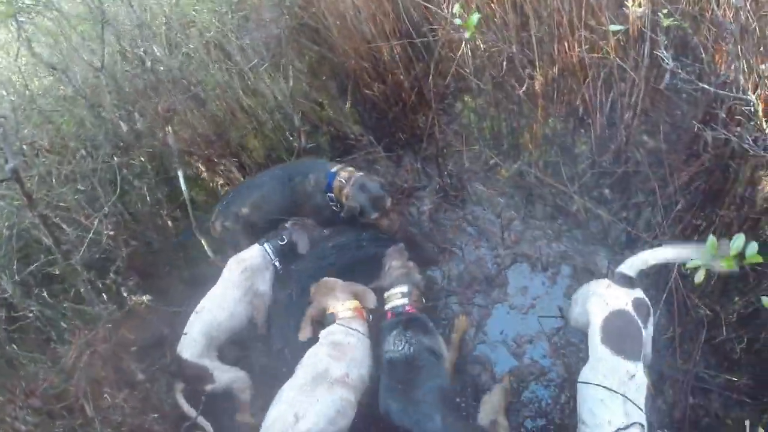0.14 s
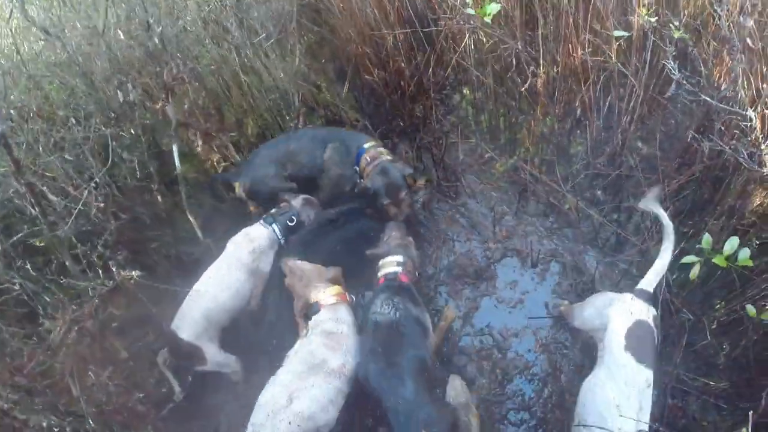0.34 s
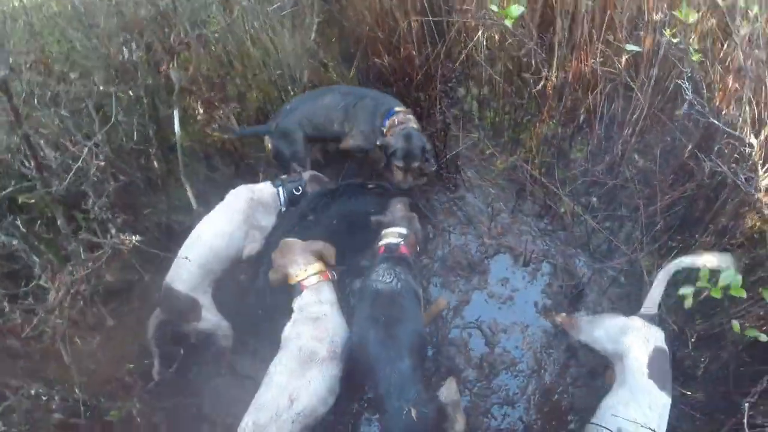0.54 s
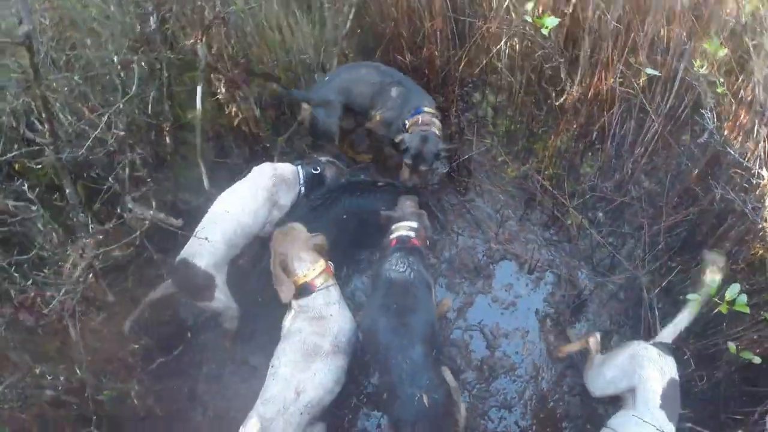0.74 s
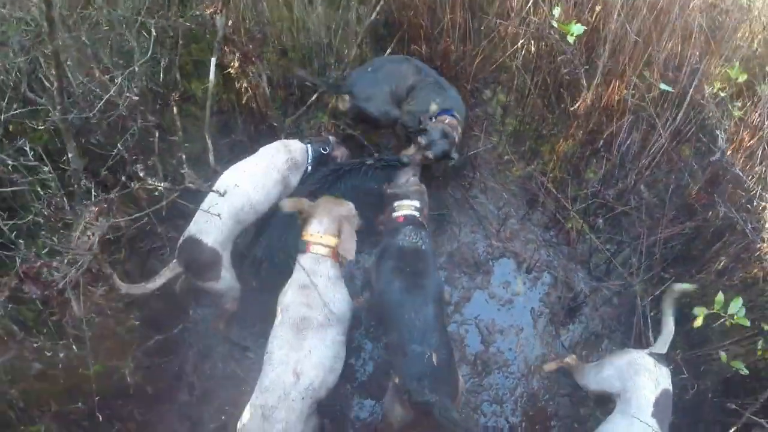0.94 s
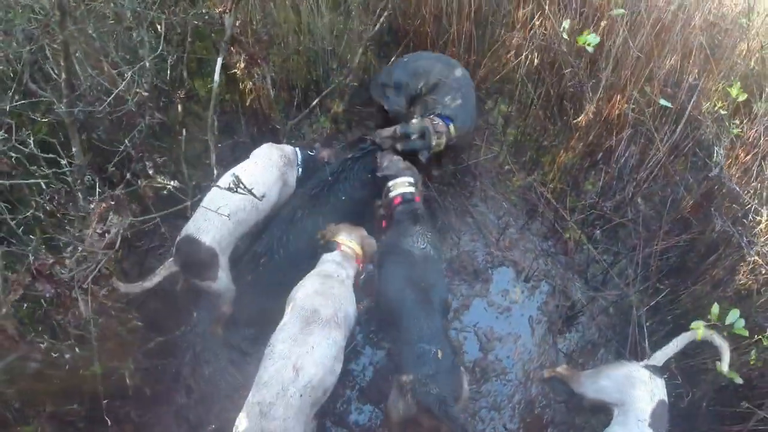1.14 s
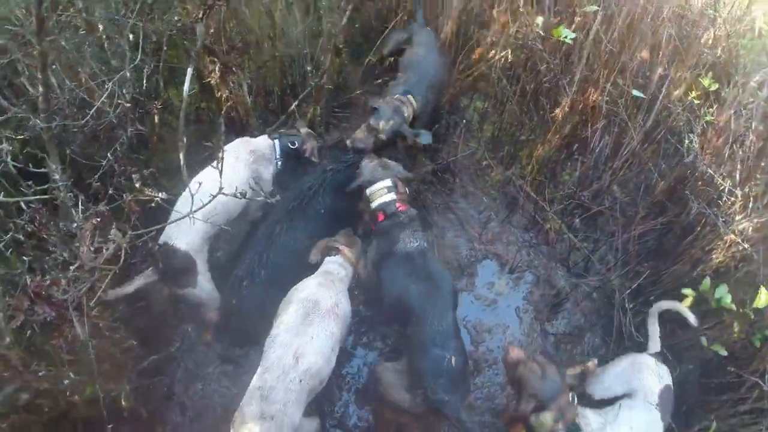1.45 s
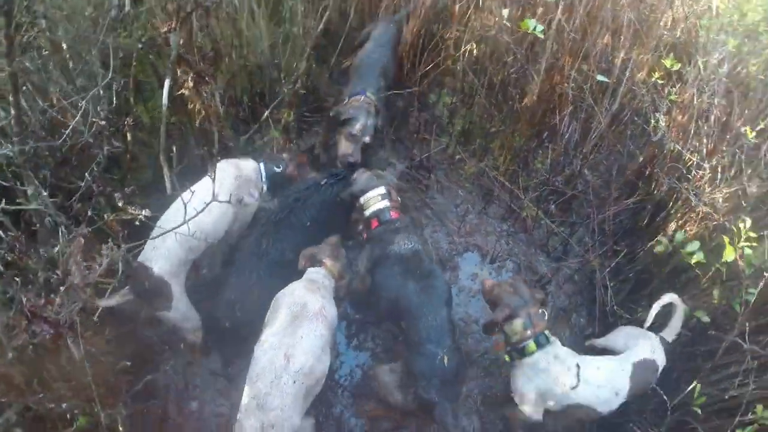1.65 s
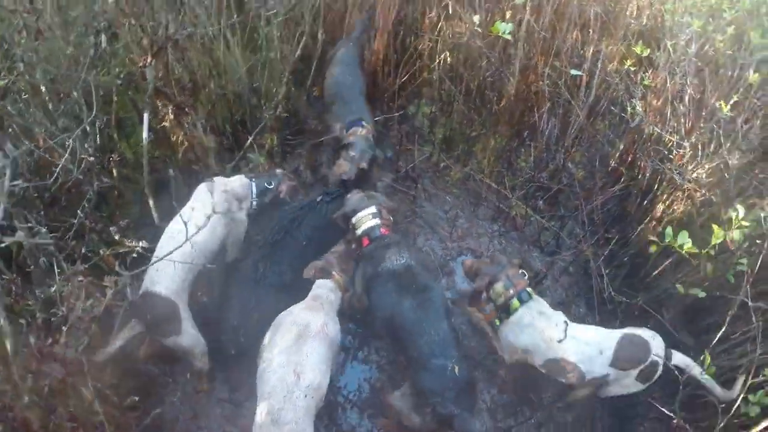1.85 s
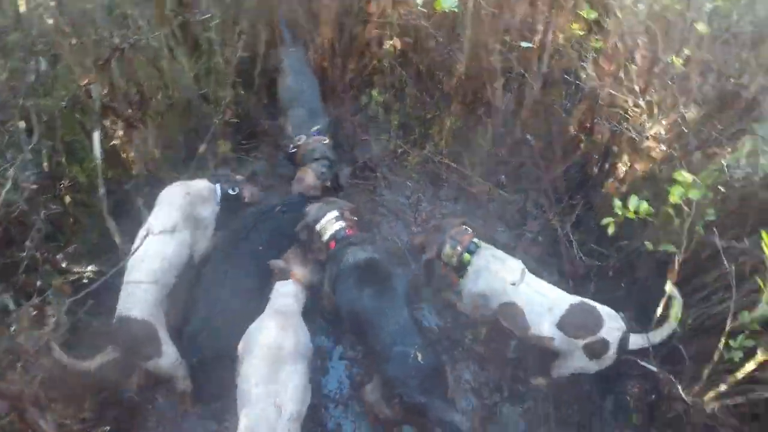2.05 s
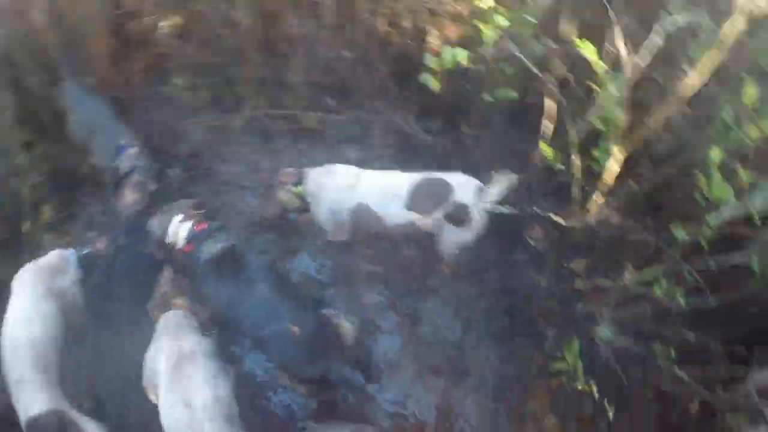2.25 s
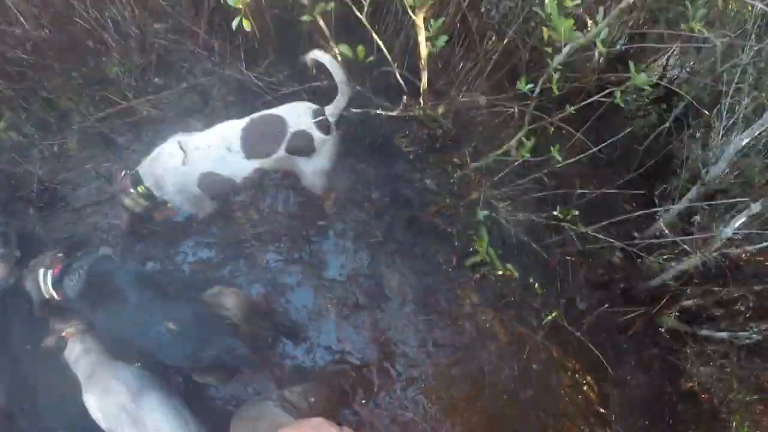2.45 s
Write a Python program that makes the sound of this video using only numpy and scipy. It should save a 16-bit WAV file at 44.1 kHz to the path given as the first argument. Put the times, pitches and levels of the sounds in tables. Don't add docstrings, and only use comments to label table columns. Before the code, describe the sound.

A hog's loud squeal ends a quiet swamp scene: first faint rustling, wet steps and twig ticks from dogs, then creaky grunts, then the shrill two-toned cry, close outdoors on a small wind-buffeted microphone.

```python
import sys
import numpy as np
from scipy import signal
from scipy.fft import rfft, irfft
from scipy.io import wavfile
from scipy.ndimage import uniform_filter1d

SR = 44100
rng = np.random.default_rng(int(sys.argv[2]) if len(sys.argv) > 2 else 0)


def voltage_ratio(decibels):
    exponent = np.asarray(decibels, float) / 20
    return 10 ** exponent


def log_audio(samples):
    frames = np.atleast_2d(samples).T
    limited = np.clip(frames, -1, 1)
    pcm = np.round(limited * 32767).astype(np.int16)
    wavfile.write(sys.argv[1], SR, pcm)


N = 114660
T = np.arange(N) / SR

# t/s, pitch f/Hz, whistle level/dB, octave level/dB, rasp level/dB
WHISTLE = [
    (2.046, 1190, -54, -43, -49),
    (2.075, 1330, -45, -33, -42),
    (2.105, 1505, -45, -37, -41),
    (2.192, 1535, -40, -38, -41),
    (2.215, 1650, -29, -49, -43),
    (2.26, 1698, -27, -52, -44),
    (2.335, 1682, -25, -43, -43),
    (2.43, 1655, -29, -46, -41),
    (2.478, 1520, -33, -36, -39),
    (2.503, 1050, -42, -50, -46),
]
WHISTLE_OVERTONES = {3: (-58, -54), 4: (-55, -48), 5: (-52, -64)}
# t/s, pitch f/Hz, level/dB, mixed-tone level/dB
LOW_VOICE = [(1.97, 372.3, -59.5, -81), (2.05, 415.8, -54.5, -55.5), (2.1, 490.3, -64, -48.5),
             (2.122, 409.7, -48, -46), (2.2, 410.4, -54, -42), (2.36, 430.8, -49, -43),
             (2.4, 497, -49, -45), (2.455, 472.4, -52.5, -41.5), (2.5, 370, -56, -49.5)]
LOW_TONES = {.5: -4, 1: 0, 1.5: -20, 2: 7, 3: -8}
# start t/s, end t/s, swell level/dB
SLIPS = [
    (2.21, 2.238, 5),
    (2.274, 2.297, 12),
    (2.326, 2.352, 13),
    (2.378, 2.41, 7),
    (2.42, 2.455, 0),
]
MIXED_TONES = {(1, -1): 0, (1, 1): 0.47, (2, -2): 0.49, (1, 2): -3, (1, -2): -6.5, (2, -1): -18.5, (2, 1): -0.076}
# t/s, depth level/dB
CHOPPING = [(2.05, 6), (2.12, 3), (2.39, 3), (2.42, 7), (2.5, 8)]
# t/s, amount 0-1
ROUGHNESS = [
    (2.04, .7),
    (2.09, .45),
    (2.12, .15),
    (2.41, .08),
    (2.46, .3),
    (2.5, .6),
]
# f/Hz, level/dB per Hz
RASP_COLOUR = [(150, -23), (1160, -11), (1430, -49), (1640, -4), (2230, -15), (3150, -8), (6810, -22.5),
               (12500, -32.5), (15000, -48)]
# f/Hz, level/dB
AIR_COLOUR = [(4000, -2), (6500, -1), (8000, -7.5), (8800, -18.5), (10300, -5.5), (12000, -18.5),
              (15000, -15)]
# t/s, level/dB
GASP = [
    (2.38, -59),
    (2.43, -44),
    (2.485, -40),
    (2.503, -88),
]
# f/Hz, level/dB
GASP_COLOUR = [(2500, -14), (4000, -10), (5000, -2), (6300, 0), (7500, -9), (11000, -20), (15000, -45)]
# t/s, peak level/dB, upper ring level/dB, brightest ring f/Hz
CREAKS = [(1.619, -32.5, -49, 2620), (1.638, -32.5, -42.5, 1860), (1.66, -37.5, -45, 1880),
          (1.678, -45, -53, 2010), (1.735, -34.5, -53, 1860), (1.753, -37.5, -61, 1800),
          (1.766, -32.5, -46.5, 1820), (1.785, -33, -37, 1810), (1.797, -32, -54, 1790),
          (1.814, -30.5, -40.5, 2290), (1.834, -36, -53, 2220), (1.854, -32.5, -36, 2280),
          (1.867, -31, -53, 2470), (1.883, -35, -54, 2340), (1.899, -36, -69, 2300),
          (1.911, -34.5, -48.5, 2530), (1.93, -34, -47, 2620), (1.944, -36.5, -55, 2525),
          (1.957, -41, -61, 2630), (1.971, -37, -50, 1800), (1.985, -37, -52.5, 2640),
          (1.997, -35, -47, 2510), (2.024, -54, -37, 1770)]
# t/s, beat rate f/Hz, level/dB
GROWL = [
    (1.99, 89.4, -55),
    (2.005, 110.7, -47),
    (2.03, 140, -47.5),
    (2.07, 190, -50),
    (2.12, 203, -80),
]
# f/Hz, level/dB, time to fall 60 dB t/s
FIRST_LOW_RINGS = [(885, 0, 0.033), (1026, 0, 0.045)]
# f/Hz, level/dB, time to fall 60 dB t/s
LOW_RINGS = [(610, 0, .03), (1040, -2, .05)]
# f/Hz, level/dB, time to fall 60 dB t/s
HIGH_RINGS = [(1770, -3.5, 0.061), (2340, -15, 0.0082), (2602, -6, 0.041), (3120, -18.5, 0.033)]
# t/s, length t/s, centre f/Hz, level/dB
RUSTLES = [(0.016, 0.019, 3400, -53.5), (0.263, 0.017, 3880, -58.5), (0.391, 0.0078, 5900, -52),
           (0.413, 0.026, 940, -52.5), (0.43, 0.015, 2270, -54.5), (0.502, 0.0079, 3700, -57),
           (0.549, 0.014, 2260, -48.5), (0.547, 0.015, 1160, -54.5), (0.611, 0.026, 820, -54),
           (0.652, 0.039, 840, -58), (0.993, 0.024, 505, -52), (1.026, 0.005, 785, -55),
           (1.1, 0.037, 3960, -58), (1.334, 0.019, 2160, -52.5), (1.353, 0.067, 5800, -62),
           (1.46, 0.038, 4860, -60.5), (1.604, 0.038, 4700, -59.5), (1.756, 0.01, 175, -45),
           (0.11, 0.08, 166, -55.5)]
# t/s, peak level/dB, centre f/Hz
TWIGS = [(0.0144, -43, 3630), (0.0817, -46, 4870), (0.21, -47.5, 8000), (0.243, -50, 11000),
         (0.2593, -43, 3680), (0.335, -48, 7000), (0.364, -41.5, 7420), (0.434, -46, 7000),
         (0.552, -43, 6500), (0.704, -53, 11000), (0.829, -51, 7000), (1.088, -43, 2980),
         (1.1038, -43, 4000), (1.1313, -47, 4930), (1.183, -53, 3540), (1.3314, -47, 2600),
         (1.452, -49, 5140), (1.725, -51.5, 6000), (1.992, -44, 5900)]
# f/Hz, level/dB per Hz
SWAMP_COLOUR = [(41, -24), (70, -6.5), (150, -7), (1110, -19.5), (1620, -23), (2080, -22), (3730, -27.5),
                (4260, -27.5), (15000, -42.5)]
# t/s, level/dB
BUSTLE = [
    (0, 4.5),
    (.55, 4.5),
    (.7, 0.5),
    (1.05, 4),
    (1.25, 0.5),
    (1.5, 4),
]
# t/s, rumble level/dB
WIND = [(0, -39), (.17, -45), (.4, -40), (1.0, -42), (1.07, -35.5), (1.3, -42), (1.59, -36.5),
        (1.66, -43.5), (1.75, -35.5), (2.2, -40), (2.27, -29.5), (2.4, -40), (2.6, -41.5)]
# f/Hz, width f/Hz, boost level/dB
PORTS = [(1143, 113, 5.5), (2235, 880, 8.5), (3753, 250, 11.5), (4924, 190, 7.5), (6060, 940, 3.5),
         (7380, 230, 4.5)]


def curve(table, col):
    a = np.array(table, float)
    return np.interp(T, a[:, 0], a[:, col])


def unit(x):
    return x / np.sqrt(np.mean(x ** 2))


def noise():
    return rng.standard_normal(N)


def shape(x, gain_db):
    hz = np.maximum(np.fft.rfftfreq(N, 1 / SR), 1)
    return irfft(rfft(x) * voltage_ratio(gain_db(hz)), N)


def colour(points):
    a = np.array(points, float)
    return lambda f: np.interp(np.log(f), np.log(a[:, 0]), a[:, 1])


def walk(rate):
    k = int(SR / rate)
    return unit(uniform_filter1d(uniform_filter1d(noise(), k), k))


def ring(x, modes, rise=0):
    out = 0
    for hz, db, t60 in modes:
        turn = np.exp(2j * np.pi * hz * (T + rise))
        decay = np.exp(-np.log(1000) / (t60 * SR))
        out = out + voltage_ratio(db) * (turn * signal.lfilter([1], [1, -decay], x / turn)).imag
    return out


def soften(x):
    width = int(.007 * SR)
    return uniform_filter1d(uniform_filter1d(x, width), width)


def gate(table):
    release_db_s = 2000
    outside_s = np.maximum(T - table[-1][0], 0) + np.maximum(table[0][0] - T, 0)
    return voltage_ratio(-release_db_s * outside_s)


def whistle_tones(high, rough, late):
    out = 0
    for k, (early_db, late_db) in WHISTLE_OVERTONES.items():
        db = early_db + (late_db - early_db) * late + 3.1 * walk(55) - 19 * rough
        breaks = voltage_ratio(5 * (np.tanh(2 * walk(100)) - 0.5))
        out = out + voltage_ratio(db) * np.sin(k * high + .5 * walk(300)) * breaks
    for k in (1, 2):
        out = out + voltage_ratio(curve(WHISTLE, k + 1) + 2 * walk(54)) * np.sin(k * high)
    return out


def low_voice_tones(low, slip):
    out = 0
    for k, db in LOW_TONES.items():
        out = out + voltage_ratio(db + 2.3 * np.tanh(walk(66)) - 14 * slip) * np.sin(k * low)
    return out


def mixed_tones(high, low, slip, swell_db, late):
    throat_hz, throat_width_hz, throat_db = 2255, 280, 12
    out = 0
    for (m, n), db in MIXED_TONES.items():
        level = db + 2 * walk(33) - 10 * (n == -2) * (1 - late) - 10 * (n == 2) * slip
        out = out + voltage_ratio(level) * np.sin(m * high + n * low + .45 * walk(250))
    throat = lambda f: throat_db / (1 + ((f - throat_hz) / throat_width_hz) ** 2)
    out = shape(out * voltage_ratio(curve(LOW_VOICE, 3)), throat)
    out = out * voltage_ratio(curve(CHOPPING, 1) * (np.tanh(walk(420)) - 0.52))
    return out + shape(out * (voltage_ratio(swell_db) - 1), lambda f: throat(f) * 2 - 2 * throat_db)


def high_mixed_tones(high, low):
    out = 0
    for m in range(3, 9):
        for n in range(-2, 2):
            level = -53 - 3 * abs(n) + 5.75 * walk(69)
            out = out + voltage_ratio(level) * np.sin(m * high + n * low + .25 * m * walk(220))
    return shape(out, colour(AIR_COLOUR)) * 100


def breath_rasp(low):
    pulsing = noise() * (1 + 0.47 * np.cos(low))
    return unit(shape(pulsing, colour(RASP_COLOUR))) * voltage_ratio(1.2 * walk(52))


def last_gasp():
    return unit(shape(noise(), colour(GASP_COLOUR))) * voltage_ratio(curve(GASP, 1) + 1.8 * walk(200))


def squeal():
    slip, swell_db = np.zeros(N), np.zeros(N)
    for start, end, db in SLIPS:
        inside = (T > start) & (T < end)
        slip += inside
        swell_db += db * inside
    slip, swell_db = soften(slip), soften(swell_db)
    late = soften(1. * (T > 2.205))
    rough = curve(ROUGHNESS, 1)

    high_hz = curve(WHISTLE, 1) * (1 + .005 * walk(117))
    low_hz = curve(LOW_VOICE, 1) * (1 - slip) + slip * high_hz / 3
    low_hz = low_hz * (1 + .02 * walk(136.3))
    high = 2 * np.pi * np.cumsum(high_hz) / SR + .8 * rough * walk(500)
    low = 2 * np.pi * np.cumsum(low_hz) / SR

    flutter = voltage_ratio(5 * rough * walk(250))
    airy = (breath_rasp(low) + high_mixed_tones(high, low)) * voltage_ratio(curve(WHISTLE, 4))
    upper = 1.26 * whistle_tones(high, rough, late) * flutter + last_gasp() + airy
    lower = low_voice_tones(low, slip) * voltage_ratio(curve(LOW_VOICE, 2))
    lower = lower + mixed_tones(high, low, slip, swell_db, late)
    return upper * gate(WHISTLE) + 1.234 * lower * gate(LOW_VOICE)


def growl_beats():
    turns = np.cumsum(curve(GROWL, 1) * (1 + .15 * walk(60))) / SR
    clicks = np.diff(np.floor(turns), prepend=0)
    scatter_db = 2.5 * noise()
    active = (T > GROWL[0][0]) * (T < GROWL[-1][0])
    return uniform_filter1d(clicks * voltage_ratio(curve(GROWL, 2) + scatter_db + 7) * active, size=12)


def grunt():
    low, high, own = np.zeros(N), np.zeros(N), np.zeros(N)
    t = np.arange(900) / SR
    ring_fade = (1 - np.exp(-t / 0.0013)) * np.exp(-t / 0.0038)
    for at, db, upper_db, hz in CREAKS:
        i = int(at * SR)
        puff = rng.standard_normal(220) * np.hanning(220)
        low[i:i + 40] += voltage_ratio(db - 30) * np.hanning(40)
        high[i:i + 220] += voltage_ratio(upper_db - 17.5) * puff
        own[i:i + 900] += voltage_ratio(upper_db + 7.5) * np.sin(2 * np.pi * hz * t) * ring_fade
    beats = growl_beats()
    mouth_from_s, mouth_rise_per_s = 1.85, .9
    rise = .5 * mouth_rise_per_s * np.maximum(T - mouth_from_s, 0) ** 2
    first = T < 1.7
    out = ring(low * first, FIRST_LOW_RINGS) + ring(low * ~first + beats, LOW_RINGS, rise)
    out = out + ring(high + 1.4 * beats, HIGH_RINGS) + own
    return shape(out, lambda f: -18 * np.maximum(np.log2(f / 3300), 0) - 14 * np.maximum(np.log2(560 / f), 0))


def brush_echoes(hog):
    tail = rng.standard_normal(4000) * np.exp(-np.arange(4000) / 500)
    tail = tail / np.sqrt(np.sum(tail ** 2))
    return voltage_ratio(-13) * signal.fftconvolve(hog, tail)[:N]


def rustles():
    out = 0
    for t, length, hz, db in RUSTLES:
        grit = noise() * voltage_ratio(2.5 * rng.exponential(size=N))
        steep = 60 if hz < 2400 else 22

        def tone(f):
            octaves = np.log2(f / hz)
            return -steep * octaves ** 2 / (1 + 2 * np.abs(octaves))

        width = length * np.where(T < t, .3, .55)
        out = out + unit(shape(grit, tone)) * voltage_ratio(db) * np.exp(-.5 * ((T - t) / width) ** 2)
    return out


def twigs():
    snap_s = 0.0035
    out = 0
    for t, db, hz in TWIGS:
        tone = lambda f: -14 * np.log2(f / hz) ** 2 - 6.7 * np.maximum(np.log2(f / 9000), 0)
        fade = (T >= t) * np.exp(-np.maximum(T - t, 0) / snap_s)
        out = out + unit(shape(noise(), tone)) * voltage_ratio(db - 9) * fade
    return out


def swamp():
    out, swell = 0, walk(31)
    for hz in 70 * 2 ** np.arange(0, 8, .5):
        grit = noise() * voltage_ratio(1.5 * rng.exponential(size=N))
        band = shape(grit, lambda f: colour(SWAMP_COLOUR)(f) - 40 * np.log2(f / hz) ** 2)
        bustle = curve(BUSTLE, 1) * min(hz / 1500, 1)
        out = out + band * voltage_ratio(bustle + swell + walk(7.2))
    return unit(out) * voltage_ratio(-55.5)


def wind():
    tone = lambda f: -23 * np.maximum(np.log2(f / 29.6), 0) - 12 * np.maximum(np.log2(20 / f), 0)
    rumble = shape(noise(), tone)
    rumble = rumble / np.sqrt(uniform_filter1d(rumble ** 2, int(.07 * SR)))
    return rumble * voltage_ratio(uniform_filter1d(curve(WIND, 1), size=600))


def port_ringing(x):
    return shape(x, lambda f: sum(db / (1 + ((f - hz) / width * 2) ** 2) for hz, width, db in PORTS))


def scene():
    hog = squeal() + grunt()
    hog = hog + brush_echoes(hog)
    around = port_ringing(swamp() + rustles() + twigs())
    return (hog + around + wind())[None, :]


def top_cut(x):
    return signal.sosfilt(signal.butter(12, 15190, fs=SR, output="sos"), x)


def record(dry):
    mix = shape(dry, lambda f: -80 / (1 + np.exp((15250 - f) / 50)))
    return top_cut(mix)


dry = scene()
out = record(dry)
log_audio(out)
```